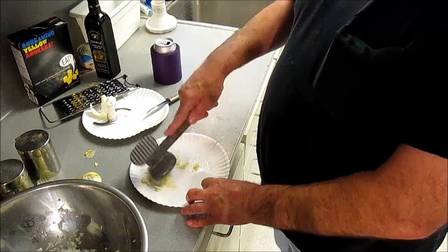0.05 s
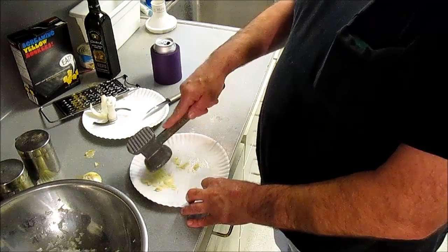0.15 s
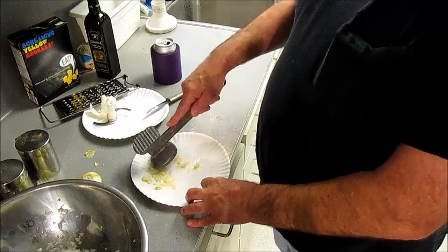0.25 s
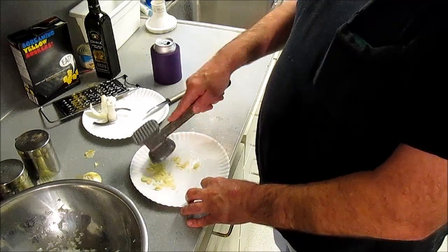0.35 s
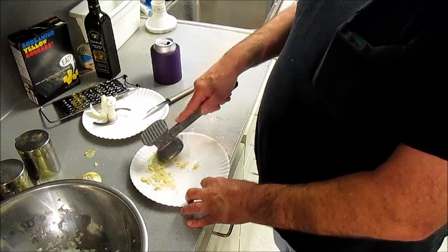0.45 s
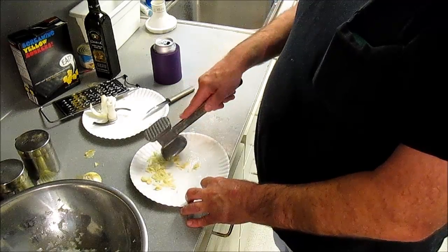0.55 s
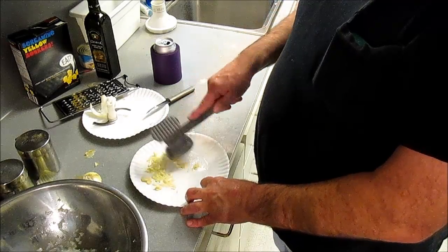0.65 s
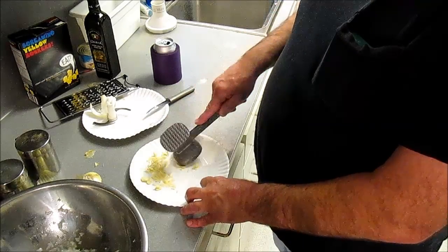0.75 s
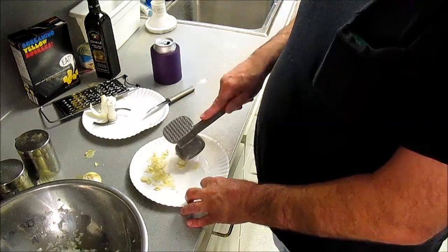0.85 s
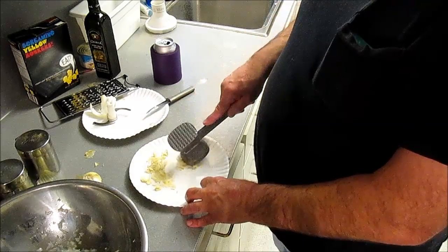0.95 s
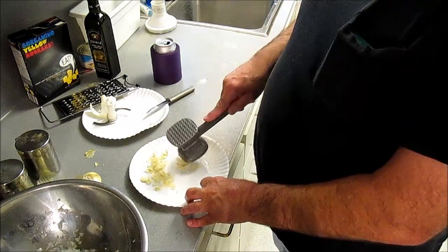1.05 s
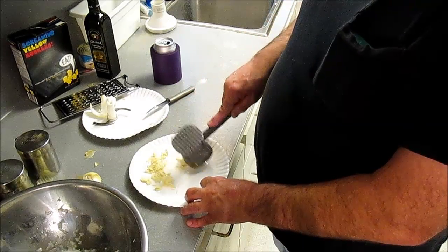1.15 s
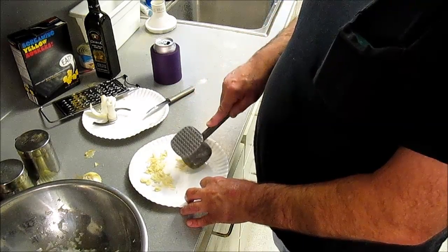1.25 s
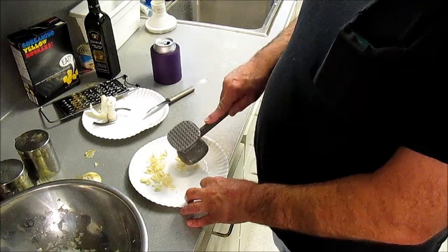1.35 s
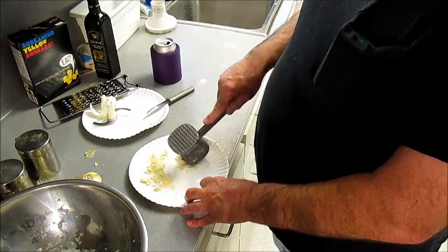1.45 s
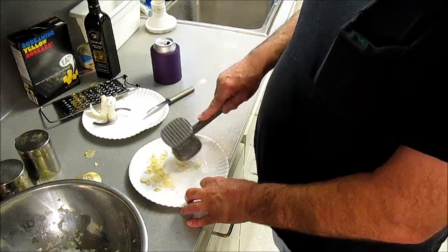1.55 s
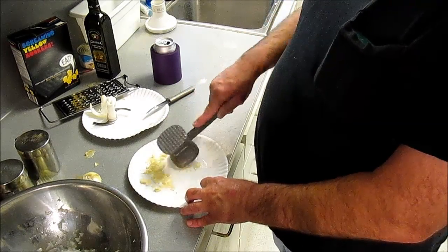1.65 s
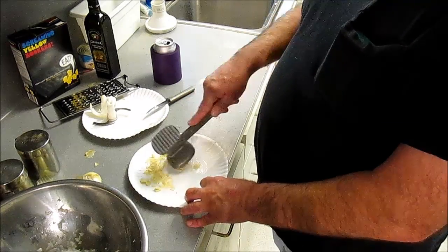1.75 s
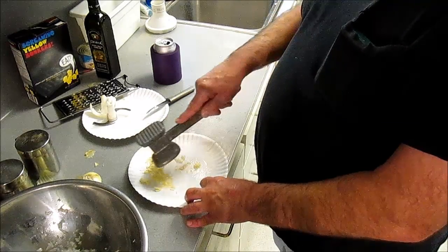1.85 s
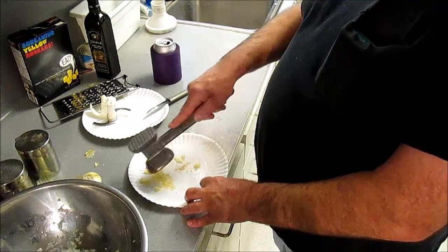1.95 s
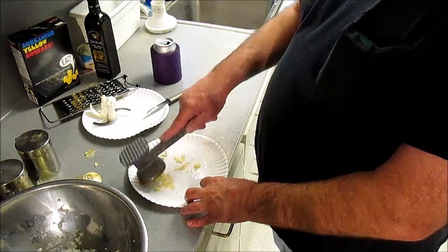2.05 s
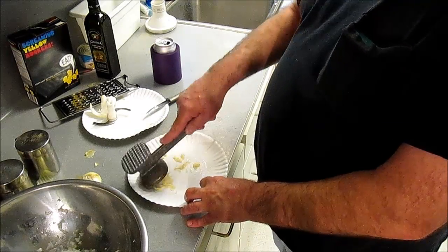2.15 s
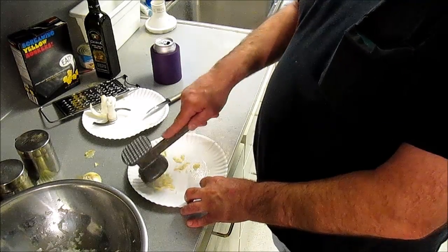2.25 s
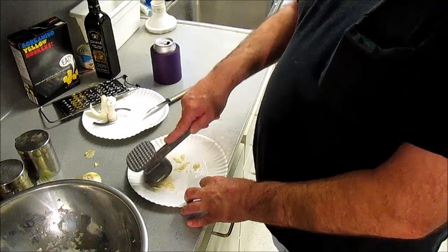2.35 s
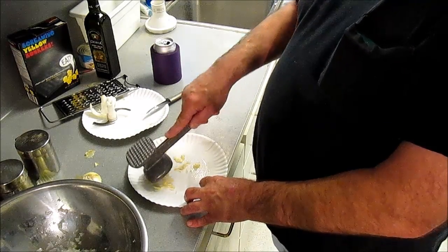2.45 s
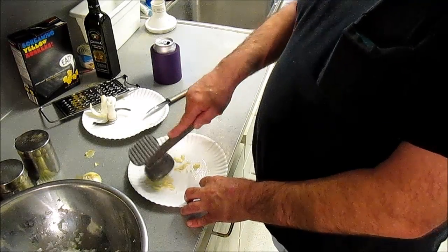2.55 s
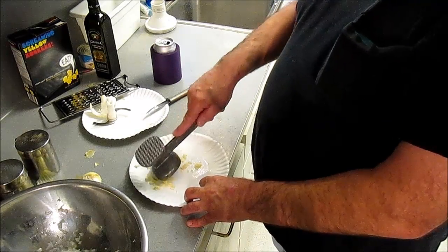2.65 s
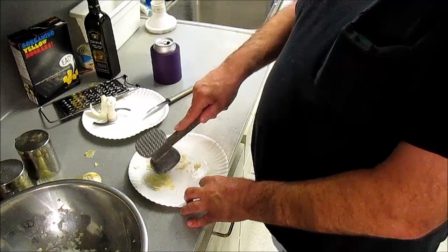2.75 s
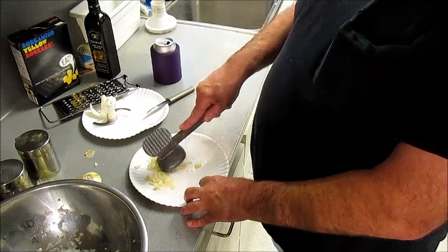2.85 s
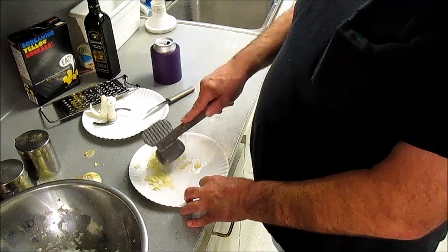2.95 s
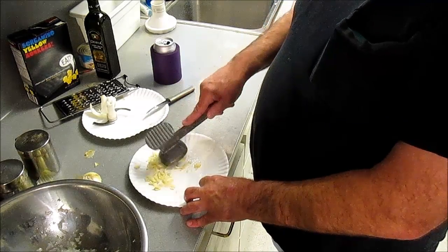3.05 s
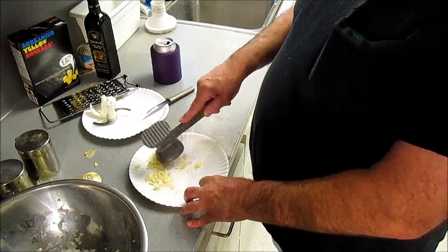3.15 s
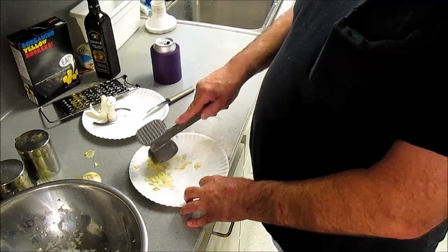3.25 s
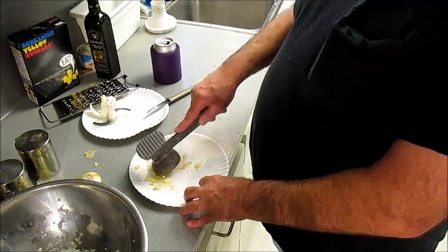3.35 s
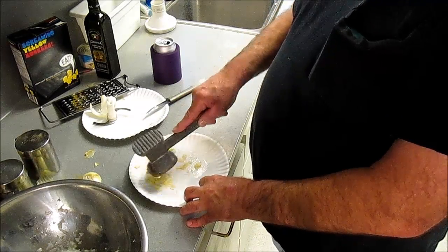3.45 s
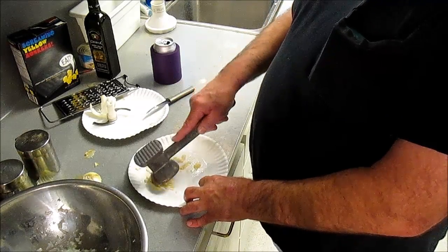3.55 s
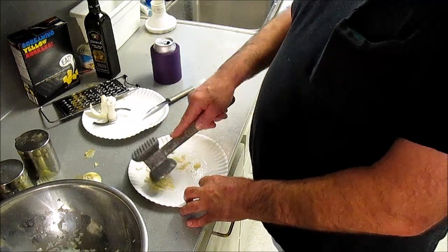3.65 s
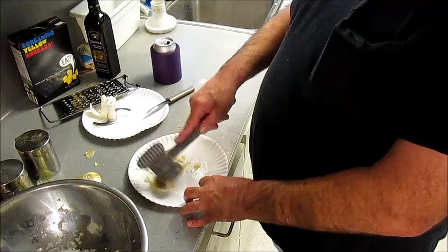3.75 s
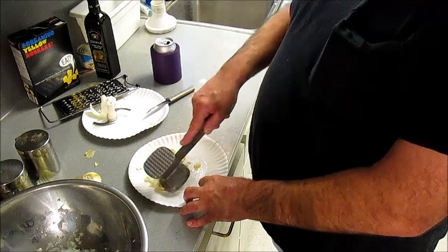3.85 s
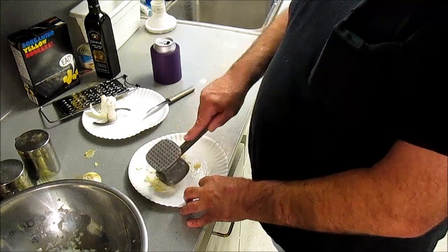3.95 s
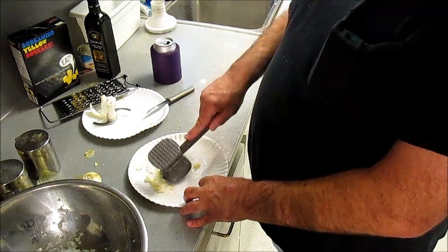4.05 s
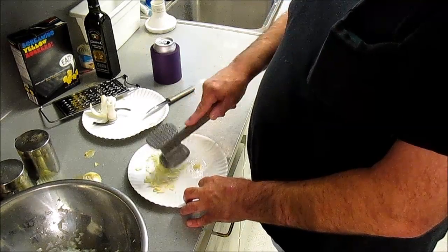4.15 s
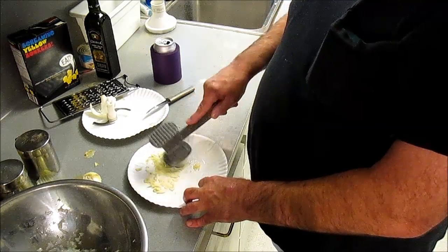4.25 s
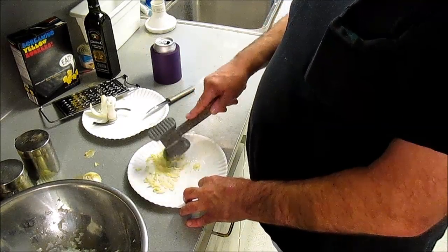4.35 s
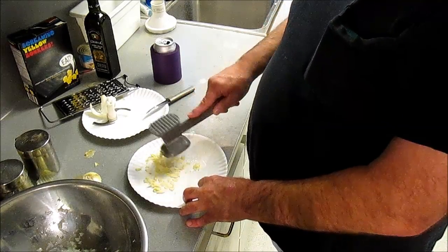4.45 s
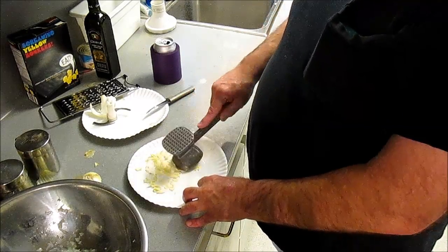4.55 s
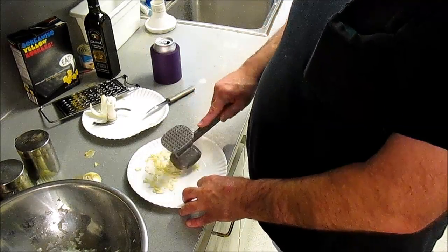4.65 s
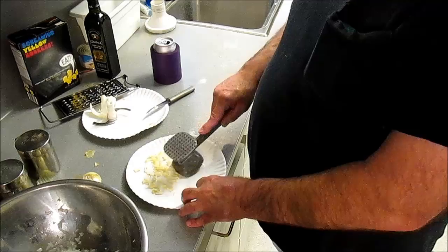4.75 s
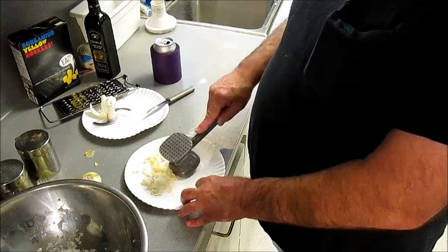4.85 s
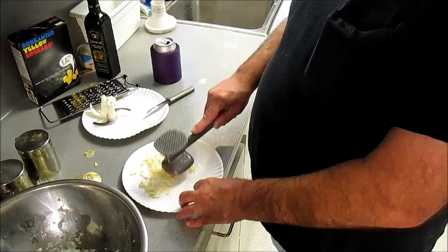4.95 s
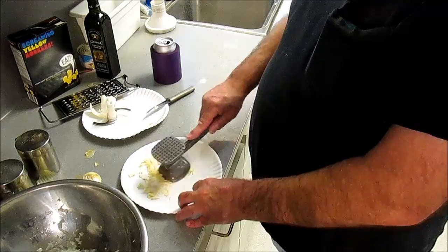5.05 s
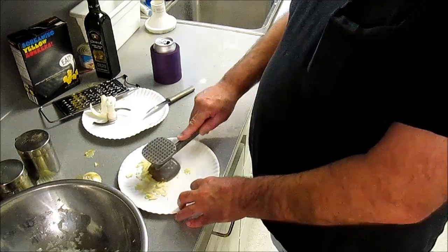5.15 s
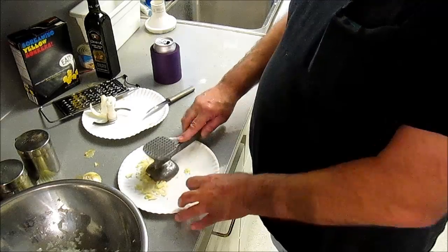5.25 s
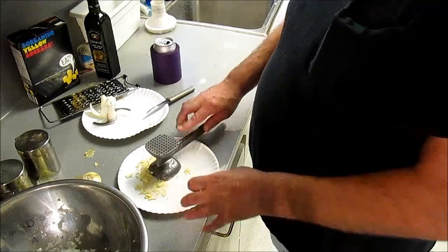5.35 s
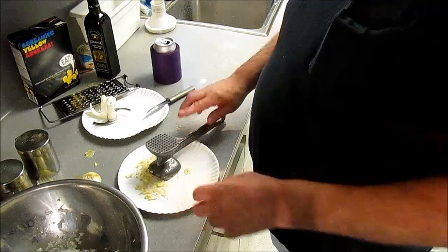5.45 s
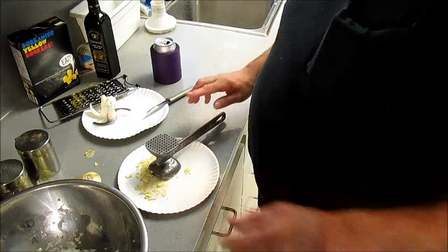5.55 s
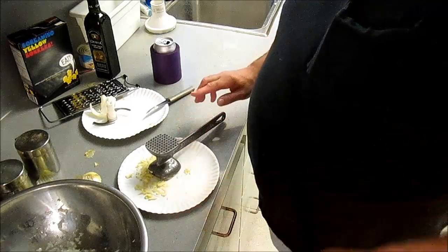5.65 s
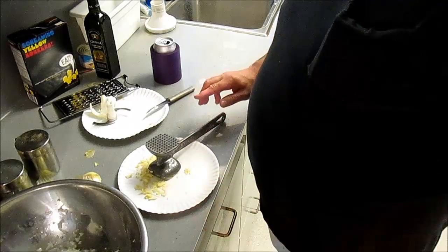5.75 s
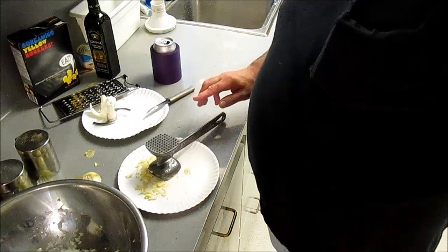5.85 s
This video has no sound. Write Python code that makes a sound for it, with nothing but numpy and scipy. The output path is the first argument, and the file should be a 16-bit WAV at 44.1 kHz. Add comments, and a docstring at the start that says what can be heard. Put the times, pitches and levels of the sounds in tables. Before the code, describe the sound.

Close to the microphones, steady knocks sound on a kitchen countertop as a metal mallet crushes garlic on a paper plate. The blows mix a hollow thump, a light slap and a slight crunch, with a short room echo. After about five seconds the pounding stops, and the mallet clacks onto the counter and pings briefly. Soft air noise and a low appliance hum continue throughout.

```python
"""Pounding garlic in a small kitchen

Close on the counter, a pair of microphones hears a metal mallet pound garlic on a paper plate, about
four knocks a second. Each blow crushes the clove, slaps the plate and rings the countertop; soft pulp
cushions and dulls it. At the end the mallet is stood on the counter and pings. An appliance hums low."""
import sys
import numpy as np
from scipy import signal
from scipy.fft import rfft, irfft, next_fast_len
from scipy.io import wavfile

SR = 44100
rng = np.random.default_rng(int(sys.argv[2]) if len(sys.argv) > 2 else 0)


def wrap_up_sound(samples):
    """Save the sound to the file named by the first command line argument, as 16-bit audio."""
    columns = np.atleast_2d(samples).T
    # keep every value between -1 and 1, then stretch to whole-number steps
    tamed = np.clip(columns, -1, 1)
    steps = np.round(tamed * 32767).astype(np.int16)
    wavfile.write(sys.argv[1], SR, steps)


N = 259772
LEAD = SR // 10  # the pounding is already under way at time zero
SIZE = N + LEAD
RING = np.arange(int(.7 * SR)) / SR  # time since a contact [s]
PING_HZ = 3239  # the mallet's strongest mode

# mallet blows, crunchy on a fresh piece of clove and less so on pulp:
# (time [s], force [dB], contact hardness [dB at 1 kHz], crunch [dB])
BLOWS = [(-0.03, 0.5, -4, 1), (0.2073, 1.5, -3.5, -1.5), (0.4653, 1.6, -7.5, -2.7), (0.719, 2, -2, 3.5),
         (0.9543, -1.4, -2, 1), (1.1901, -0.44, 5, 4), (1.4259, -0.95, 4, 1), (1.6715, 0.6, 3, 2.1),
         (2.1164, 0.05, 1.5, 0), (2.358, 0.04, 0.1, 1.5), (2.604, -0.24, 3.5, 0), (2.8509, -1.5, 0.8, -2),
         (3.0947, 0.1, -3, -2), (3.3399, -10.5, -2, -3.5), (3.575, 0, 3, 2.5), (3.8217, -0.7, 1.5, -1),
         (4.064, -2.5, 5.3, 0), (4.3026, -0.4, -1, 2.5), (4.55, -2.5, -3, -0.7), (4.7996, -2.5, -7, -1.5),
         (5.041, -1.16, 5.5, 2)]


def undb(db):
    """Decibels to gain."""
    return 10 ** (np.asarray(db) / 20)


def decay(seconds, t60):
    """A fall of 60 dB every t60 seconds."""
    return np.exp(-np.log(1000) * seconds / t60)


def add(track, s, sound):
    """Mix a sound into a track from time s on."""
    start = int(round(s * SR)) + LEAD
    track[start:start + len(sound)] += sound[:SIZE - start]


def shape(x, gain):
    """Filter by a gain that is a function of frequency."""
    size = next_fast_len(x.shape[-1] + 2048)
    hz = np.maximum(np.arange(size // 2 + 1) * SR / size, 1)
    return irfft(rfft(x, size) * gain(hz), size)[..., :x.shape[-1]]


def colour(x, points):
    """Filter by a spectrum of (frequency [Hz], level [dB]) points."""
    at, db = np.transpose(points)[:2]
    return shape(x, lambda hz: undb(np.interp(np.log(hz), np.log(at), db)))


def modes(table):
    """Struck modes; neighbouring ones swing in opposite directions."""
    return sum((-1) ** (k + 1) * undb(db) * decay(RING, t60) * np.sin(2 * np.pi * hz * RING)
               for k, (hz, db, t60) in enumerate(table))


def wash(noise, table):
    """Modes too dense to count: each band of a noise dies at its own rate."""
    at, _, t60s = np.transpose(table)
    noise = colour(noise, table)
    bands = (shape(noise, lambda hz: np.interp(np.log(hz), np.log(at), pick))
             for pick in np.eye(len(at)))
    return sum(band * decay(RING, t60) for band, t60 in zip(bands, t60s))


def diffuse(size, wide_hz, apart=0.11):
    """Noise from all sides at two closely spaced microphones: alike in the bass, unrelated on top."""
    mid, side = rng.standard_normal((2, size))
    side = shape(side, lambda hz: np.minimum(apart + hz / np.hypot(hz, wide_hz), 1))
    return np.array([mid + side, mid - side])


def garlic(sink_s=0.0028, touch_db=-9, t60=0.074, spread_db=2.5, gain_db=-39.0):
    """Cells burst in tiny clicks: a few as the head sinks in, most when it bottoms out."""
    # spectrum of tearing garlic: (frequency [Hz], level [dB])
    tearing = [(800, -34), (2000, -8), (3300, 5), (4200, -1.5), (5700, 1.5), (8000, -8.5), (10500, -14),
               (13500, -10.5), (16000, -20)]
    track = np.zeros(SIZE)
    squeeze = np.where(RING < sink_s, undb(touch_db), decay(RING - sink_s, t60))
    for s, _, _, crunch_db in BLOWS:
        bursts = rng.standard_normal(len(RING)) * (rng.random(len(RING)) < .06)
        bursts *= undb(spread_db * np.minimum(rng.exponential(size=len(RING)), 5))
        add(track, s - sink_s, undb(gain_db + crunch_db) * squeeze * bursts / bursts.std())
    return colour(track, tearing)


def countertop(knee_hz=1050, spot_db=1.25):
    """The panel rings, close up and into the room; harder, shorter contacts reach higher modes."""
    # modes of countertop and cabinet: (frequency [Hz], level [dB], t60 [s])
    panel_modes = [(118.5, -16, 0.12), (163.3, -17.5, 0.048), (179.3, -38, 0.34), (245, -20, 0.06),
                   (252.3, -16, 0.08), (323, -30, 0.12), (335, -16.5, 0.025), (394.3, -18, 0.078),
                   (393, -17, 0.06), (450, -17, 0.051), (480, -41.5, 0.55), (480.6, -20, 0.078),
                   (518.4, -33.5, 0.18), (592, -15, 0.013), (557.5, -41.5, 0.19), (602, -29, 0.088),
                   (623, -28.5, 0.13), (670, -34, 0.057), (683.5, -17.5, 0.033), (821, -20, 0.022),
                   (824, -46.5, 0.028), (866, -18.5, 0.0086), (947.5, -32, 0.15), (1083, -15, 0.036),
                   (1088.3, -12.5, 0.02), (1210, -48.5, 0.19), (1298, -32, 0.039)]
    # standing waves of the kitchen: (frequency [Hz], level [dB], t60 [s])
    room_modes = [(57.5, -36, 0.19), (79.3, -36, 0.29), (117.2, -55, 0.19), (211.2, -31, 0.38)]
    # the countertop heard from all round, its peaks and dips evened out: (frequency [Hz], level [dB])
    thud_spectrum = [(40, 17), (120, 35), (250, 28), (450, 30), (650, 22.5), (1100, 13.5), (1400, 10),
                     (2200, -9), (4000, -50)]
    near, around = np.zeros((2, SIZE))
    margin = SR // 100
    impulse = 1. * (np.arange(margin + len(RING)) == margin)
    thud = colour(impulse, thud_spectrum)
    boom = modes(room_modes)
    for s, force_db, hard_db, _ in BLOWS:
        # the head never lands on quite the same spot, which shifts the balance of the modes
        panel = modes([(hz, db + spot_db * rng.standard_normal(), t60) for hz, db, t60 in panel_modes])
        contact = lambda hz: undb(force_db + hard_db * (np.minimum(hz, knee_hz) / 1000) ** 2)
        add(near, s - margin / SR, shape(np.pad(panel + boom, (margin, 0)), contact))
        add(around, s - margin / SR, shape(thud, contact))
    return near, around


def plate(metal_db=1, spot_db=3):
    """The paper slaps on the counter, differently each time, and the held mallet rings faintly."""
    # the paper plate slapped flat: (frequency [Hz], level [dB], t60 [s])
    paper_bands = [(670, -32, 0.11), (980, -16, 0.42), (1330, -17.5, 0.11), (1565, -11.5, 0.065),
                   (2060, -16, 0.043), (2700, -24.5, 0.077), (4140, -32.5, 0.041), (5500, -52, 0.053),
                   (9400, -49, 0.12), (15000, -77, .08)]
    # modes of the mallet gripped in the fist: (frequency [Hz], level [dB], t60 [s])
    gripped_modes = [(4920, -61.5, .22), (6160, -82, .15), (13023, -64, 0.15), (13800, -74, 0.17)]
    track = np.zeros(SIZE)
    for s, force_db, hard_db, _ in BLOWS:
        # louder under a stronger blow and where less pulp cushions it
        slap_db = -6 + 1.42 * force_db + 0.51 * hard_db
        # the spot where the head lands decides which of its modes ring
        metal = modes([(hz, db + metal_db + spot_db * rng.standard_normal(), t60)
                       for hz, db, t60 in gripped_modes])
        paper = wash(rng.standard_normal(len(RING)), paper_bands)
        add(track, s, undb(slap_db) * (paper + metal))
    return track


def clutter(x, gain_db=-26, t60=0.074, wide_hz=2000):
    """Bowl, tins and bottles close by scatter the treble differently to the two microphones."""
    scatter = rng.standard_normal(len(RING)) * undb(gain_db) * decay(RING, t60)
    treble = shape(scatter, lambda hz: hz ** 2 / (hz ** 2 + wide_hz ** 2))
    side = signal.fftconvolve(x, treble)[:SIZE]
    return np.array([side, -side])


def kitchen(x, build_s=0.0047, path_count=4):
    """Reflections from cupboards and walls thicken, then fade; paths shift as arm and mallet move."""
    # reverberation of the kitchen: (frequency [Hz], level [dB], t60 [s])
    reverb_bands = [(60, -35, 0.45), (128, -42, 0.17), (253, -36.5, 0.34), (440, -41, 0.36),
                    (557, -35, 0.43), (1090, -38.5, 0.41), (2140, -36.5, 0.41), (5530, -35, 0.35),
                    (8900, -33.5, 0.26), (15000, -38, 0.34)]
    shares = shape(rng.standard_normal((path_count, SIZE)), lambda hz: np.exp(-(hz / 2) ** 2))
    shares /= np.sqrt(np.sum(shares ** 2, axis=0))  # constant total power
    build_up = 1 - np.exp(-(RING / build_s) ** 2)
    reflections = 0
    for share in shares:
        response = wash(diffuse(len(RING), wide_hz=2310), reverb_bands) * build_up
        reflections += signal.fftconvolve((share * x)[None], response, axes=1)[:, :SIZE]
    return reflections


def room_tone(air_db=-52.5, hum_hz=114, hum_db=-59, waver=0.22):
    """Steady air noise all round the microphones, and an appliance's slightly wavering hum."""
    # the kitchen's background noise: (frequency [Hz], relative density [dB])
    air_spectrum = [(18, -55), (30, -32), (59, -7.5), (79, -29), (95, -7.5), (118, -12), (149, -23),
                    (204, -14), (740, -26), (1760, -35), (3060, -47), (3310, -46.5), (4420, -47),
                    (7270, -51), (16000, -71)]
    air = colour(diffuse(N, wide_hz=1700), air_spectrum)
    drift = shape(rng.standard_normal(N), lambda hz: np.exp(-hz / 3))
    hum = np.sqrt(2) * np.sin(2 * np.pi * hum_hz * np.arange(N) / SR)
    hum *= 1 + waver * drift / drift.std()
    return undb(air_db) * air / air.std() + undb(hum_db) * hum


def set_down(resting_t60_s=1):
    """The mallet's head clacks on the counter and pings; the handle ticks down and damps that ring."""
    # the mallet touching down: (time [s], clack [dB], head ring [dB], handle ring [dB])
    touches = [(5.256, -26, -41, -28), (5.3111, -0.5, 0.5, -12), (5.5072, -18.5, -33, -7)]
    # bare metal meeting the counter: (frequency [Hz], level [dB], t60 [s])
    clack_bands = [(100, -26, 0.086), (415, -10, 0.061), (900, -12, 0.07), (2220, -10.5, 0.021),
                   (2760, -24.5, 0.039), (4500, -23.5, 0.021), (8350, -32.5, 0.019), (14900, -76, 0.033)]
    # the free mallet struck at its head: (frequency [Hz], level [dB], t60 [s])
    head_modes = [(1082, -43.5, 0.67), (1152, -43.5, 0.61), (1790, -40.5, 0.19), (PING_HZ, -36, 0.86),
                  (5120, -50, 0.12), (6724, -61, 0.54), (7100, -60, 0.5), (7741, -64, .45),
                  (8166, -58, 0.26), (11600, -56, .1), (12800, -62, .1), (14600, -63, .12)]
    # the free mallet struck at its handle: (frequency [Hz], level [dB], t60 [s])
    handle_modes = [(7192, -66, 0.63), (12300, -69, 0.89)]
    clacks, pings = np.zeros((2, SIZE))
    head, handle = modes(head_modes), modes(handle_modes)
    handle_down_s = touches[-1][0]
    for s, clack_db, head_db, handle_db in touches:
        damping = decay(np.maximum(s + RING - handle_down_s, 0), resting_t60_s)
        add(clacks, s, undb(clack_db) * wash(rng.standard_normal(len(RING)), clack_bands))
        add(pings, s, undb(head_db) * head * damping + undb(handle_db) * handle)
    return clacks, pings


def scene(ping_room_db=-3):
    """Blows and the final ping reach the microphones directly and by way of the kitchen."""
    near, around = countertop()
    clacks, pings = set_down()
    contacts = plate() + garlic() + clacks
    # the panel's sound reaches the left microphone one sample sooner
    direct = np.array([near, np.r_[0, near[:-1]]]) + contacts + pings
    bright = contacts + undb(ping_room_db) * pings
    reflected = clutter(near + bright) + kitchen(around + bright)
    return (direct + reflected)[:, LEAD:] + room_tone()


def record(dry, low_hz=38, top_hz=16200):
    """The recorder drops the deepest bass and cuts the top."""
    thinned = shape(dry, lambda hz: 1 / np.sqrt(1 + (low_hz / hz) ** 8))
    return signal.sosfilt(signal.ellip(8, .2, 70, top_hz, fs=SR, output="sos"), thinned)


dry = scene()
out = record(dry)
wrap_up_sound(out)
```